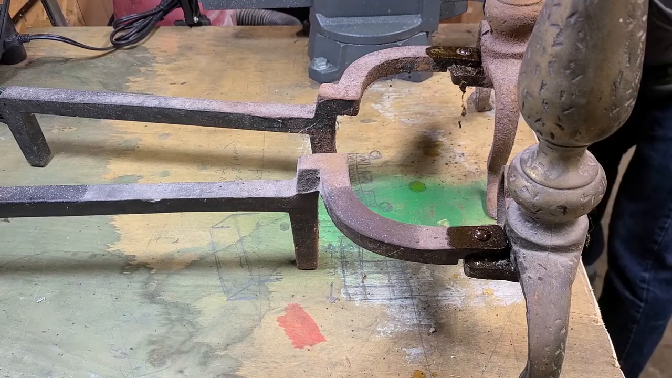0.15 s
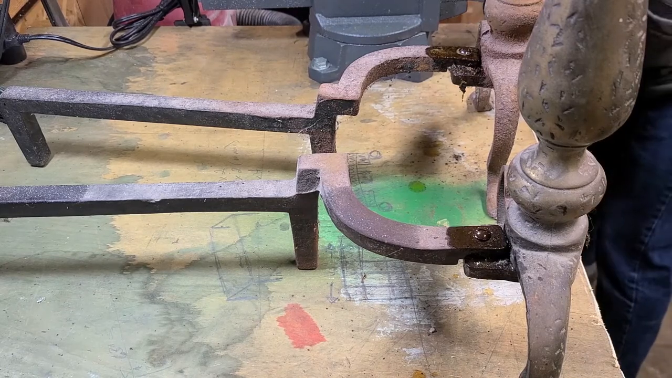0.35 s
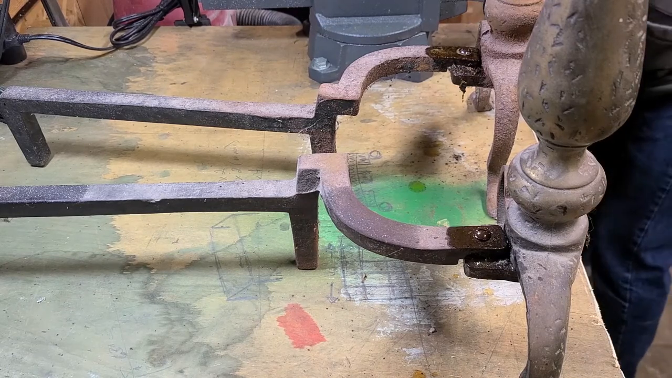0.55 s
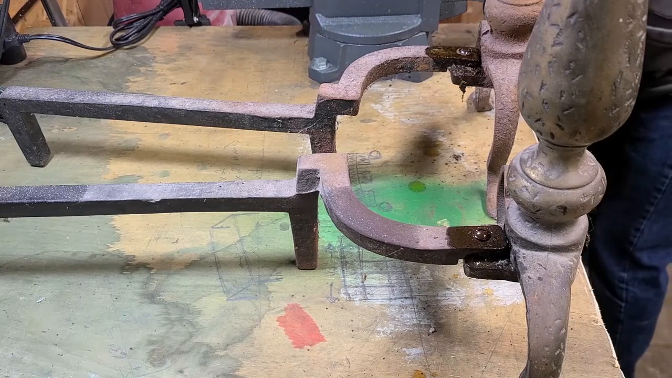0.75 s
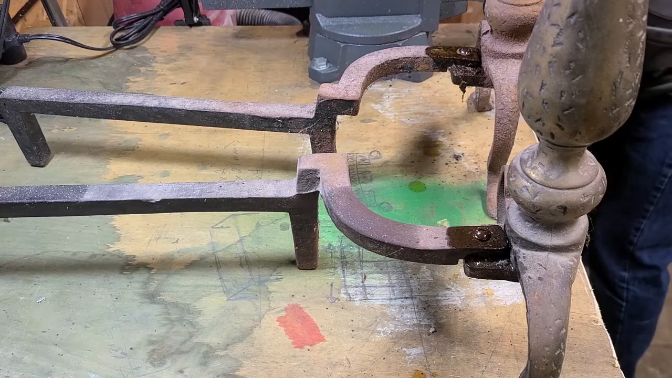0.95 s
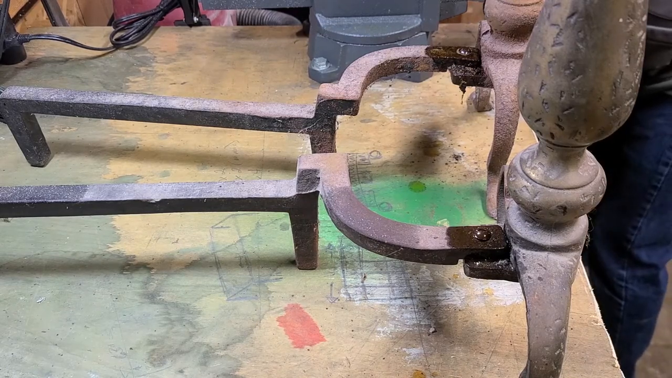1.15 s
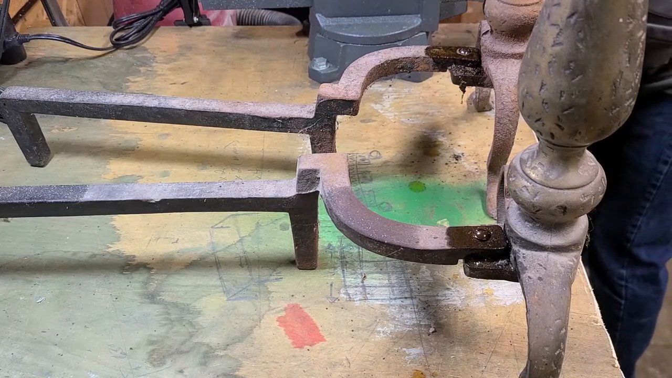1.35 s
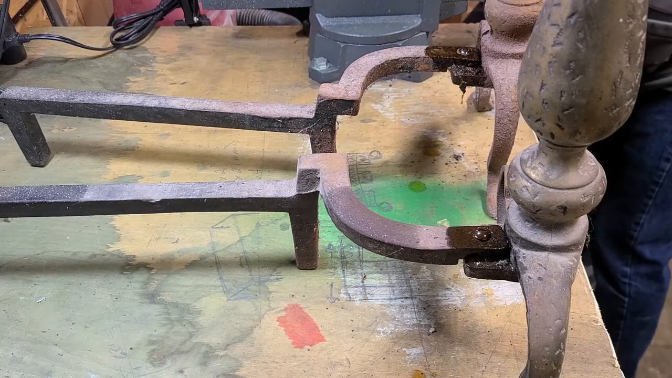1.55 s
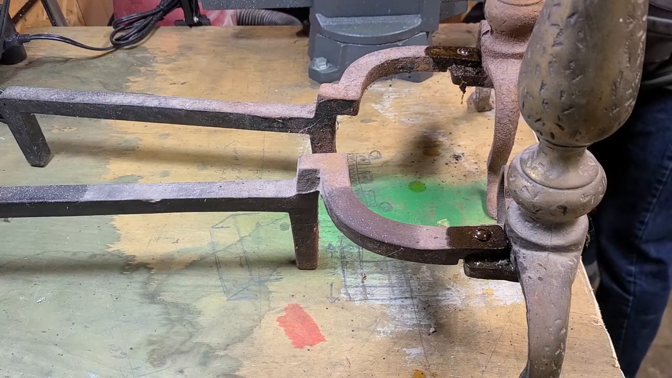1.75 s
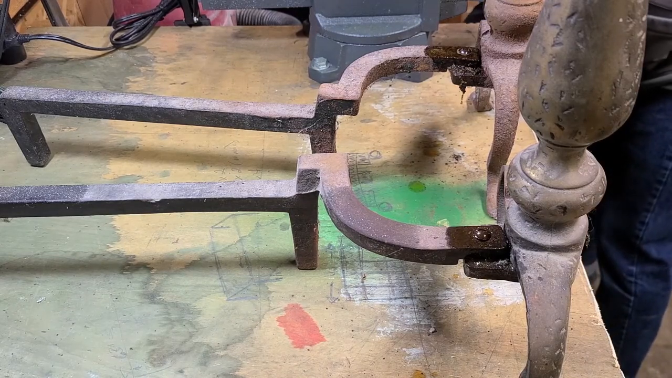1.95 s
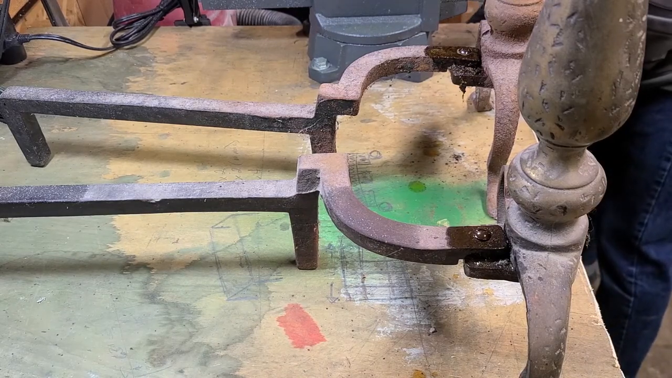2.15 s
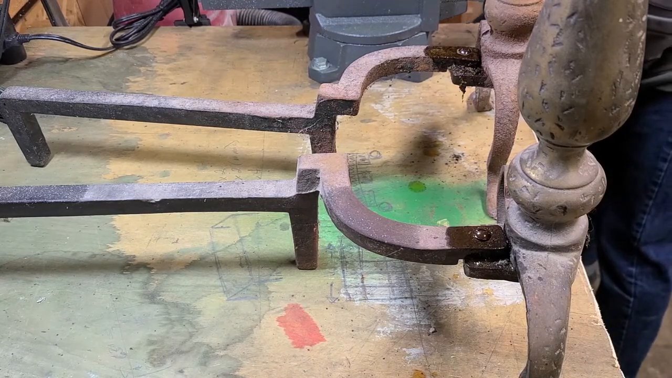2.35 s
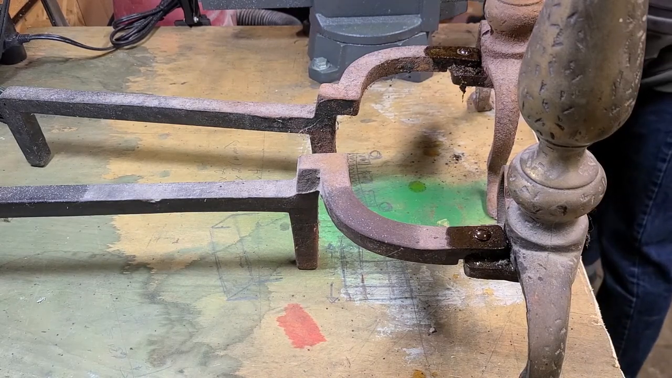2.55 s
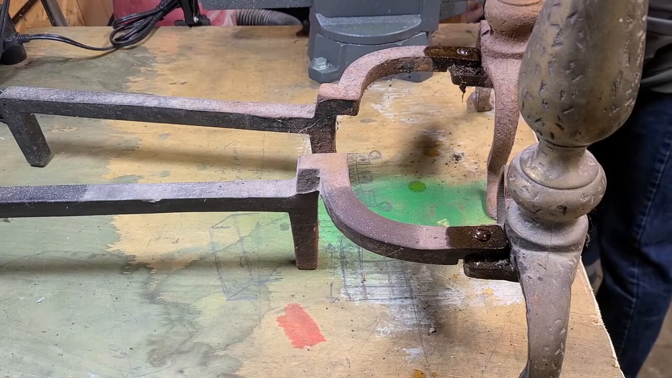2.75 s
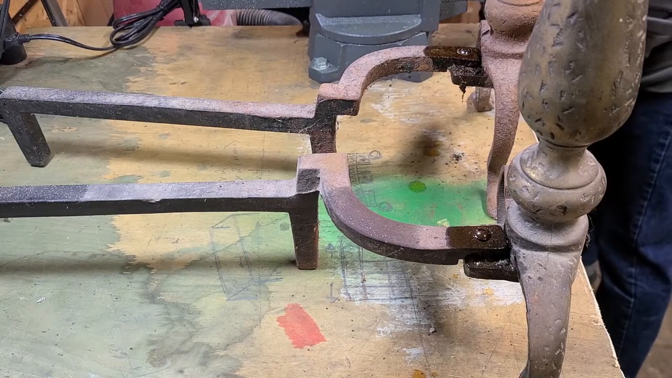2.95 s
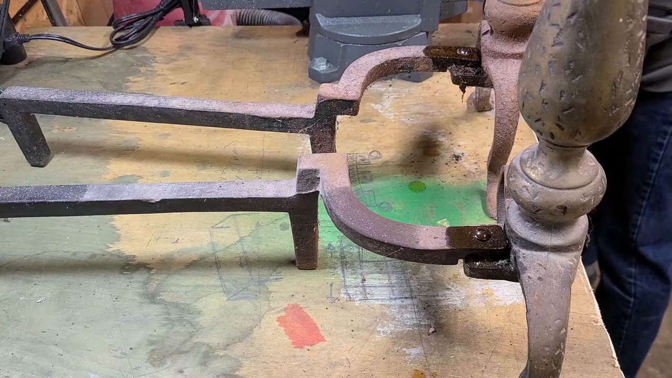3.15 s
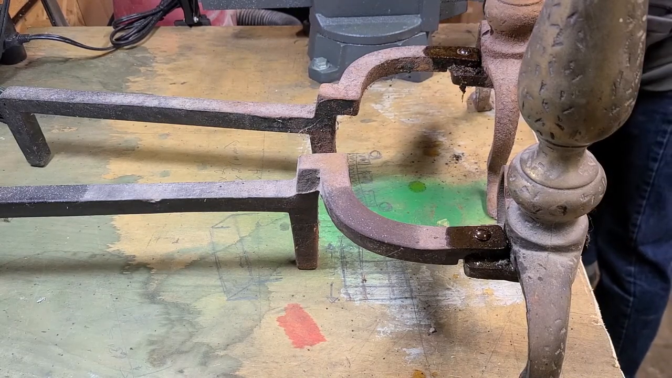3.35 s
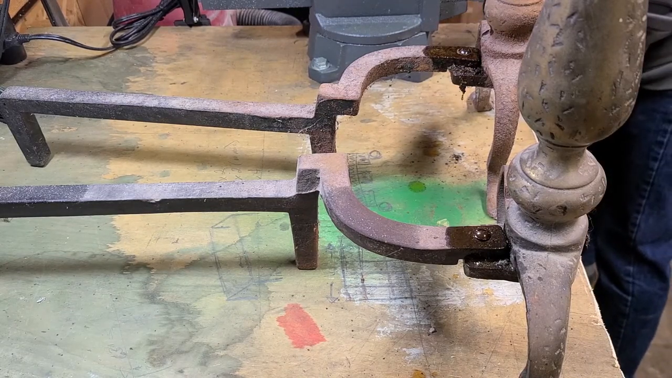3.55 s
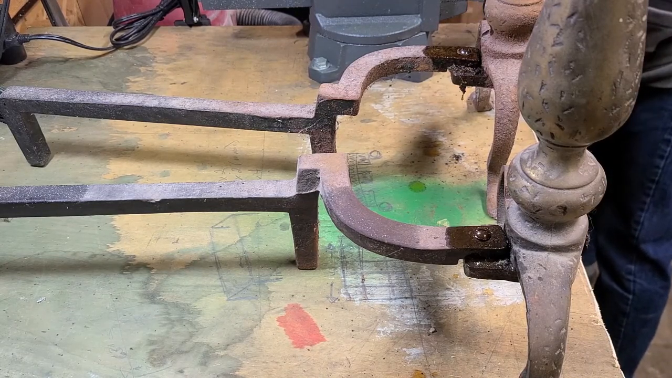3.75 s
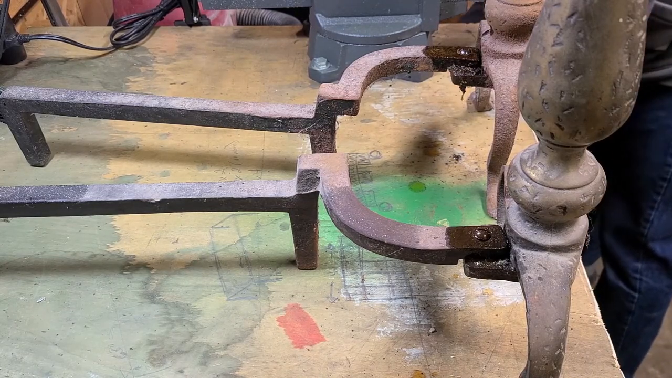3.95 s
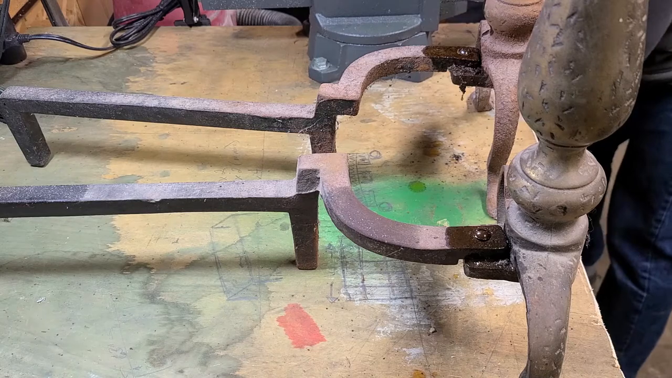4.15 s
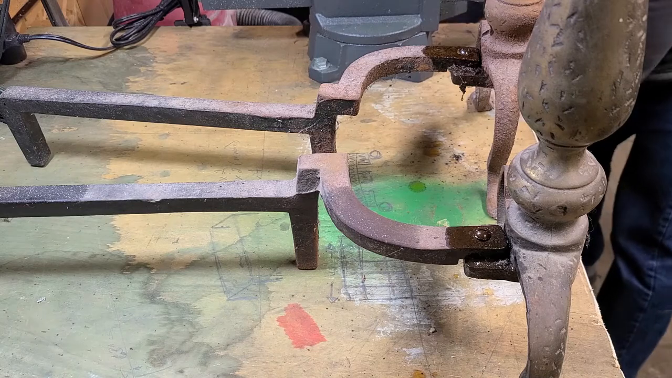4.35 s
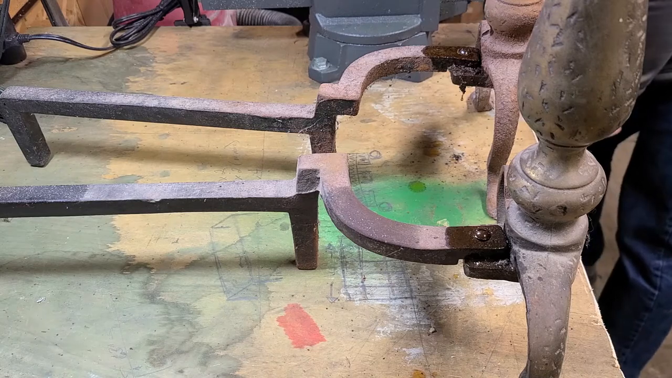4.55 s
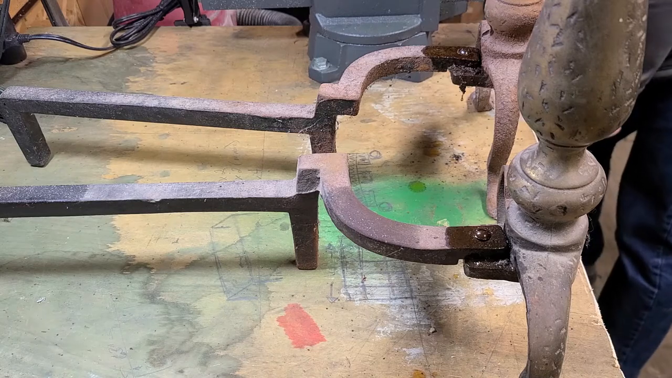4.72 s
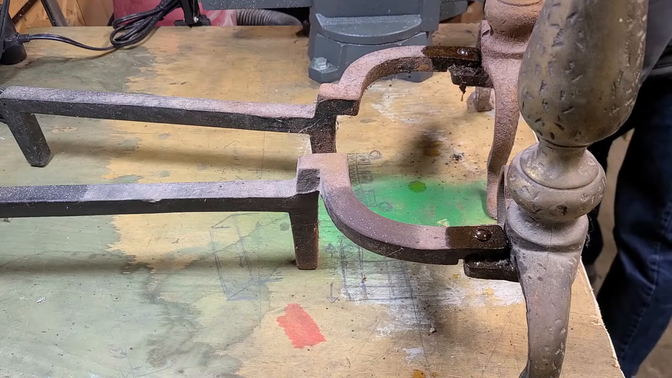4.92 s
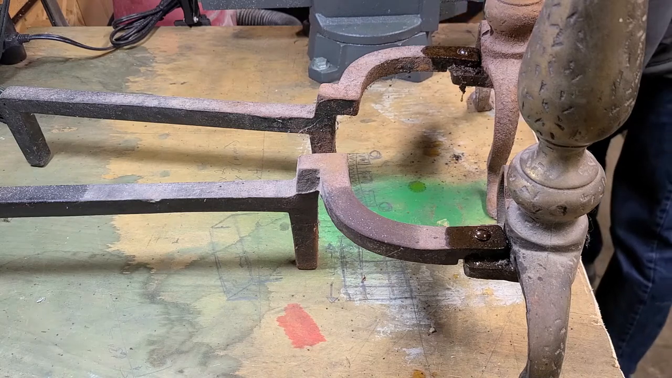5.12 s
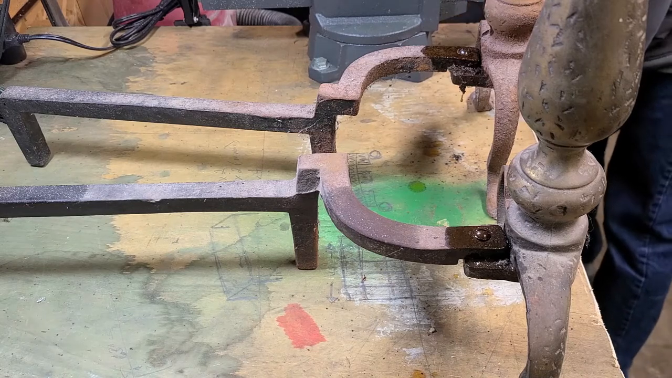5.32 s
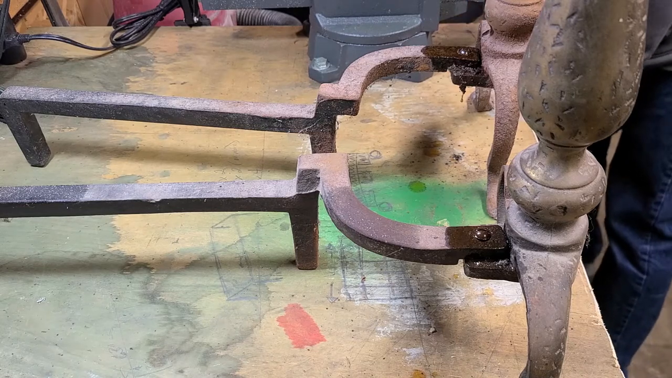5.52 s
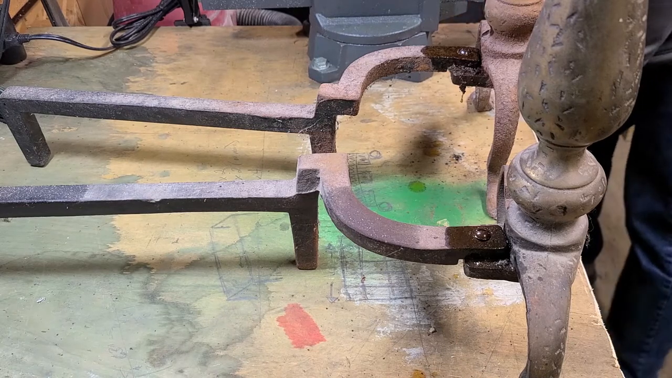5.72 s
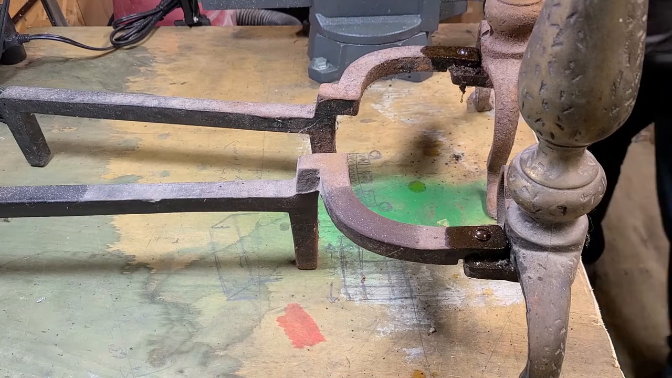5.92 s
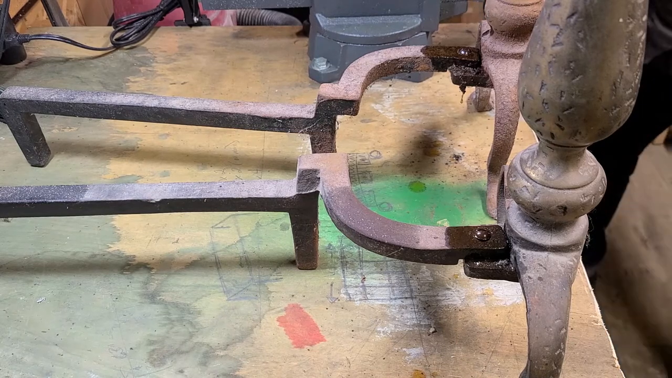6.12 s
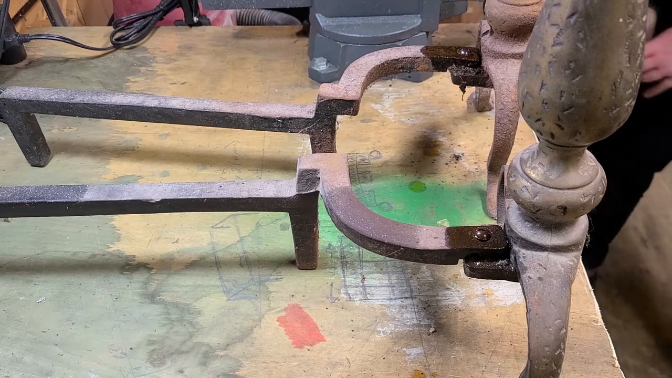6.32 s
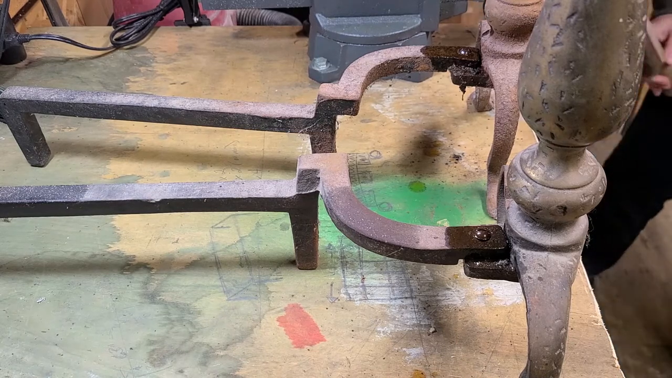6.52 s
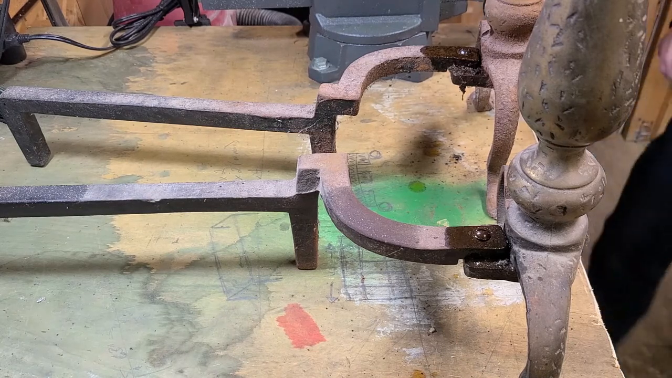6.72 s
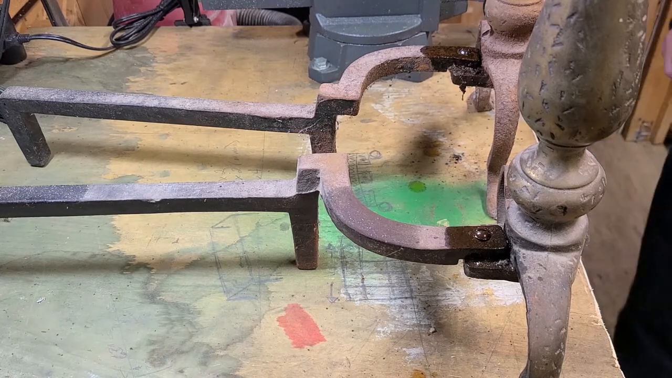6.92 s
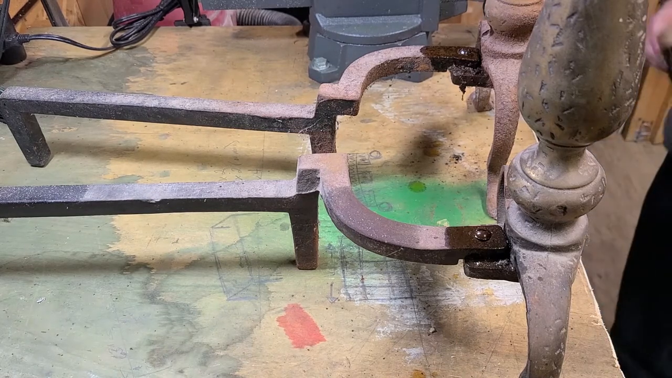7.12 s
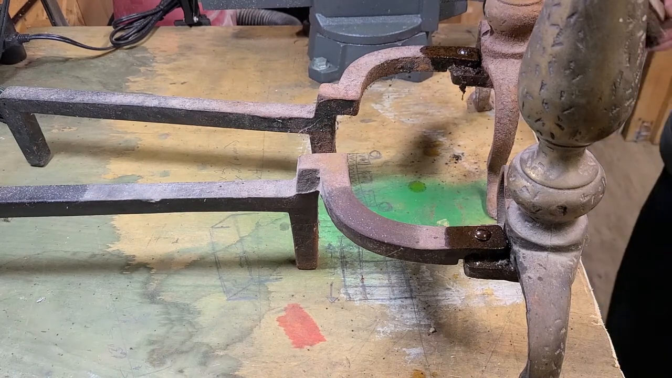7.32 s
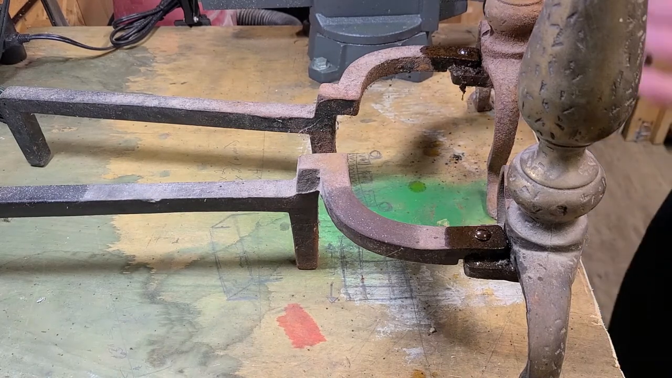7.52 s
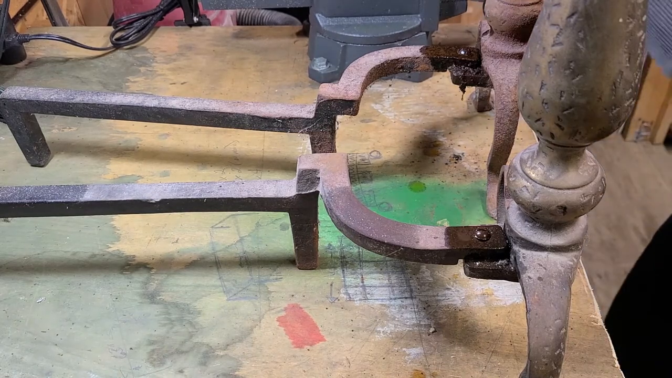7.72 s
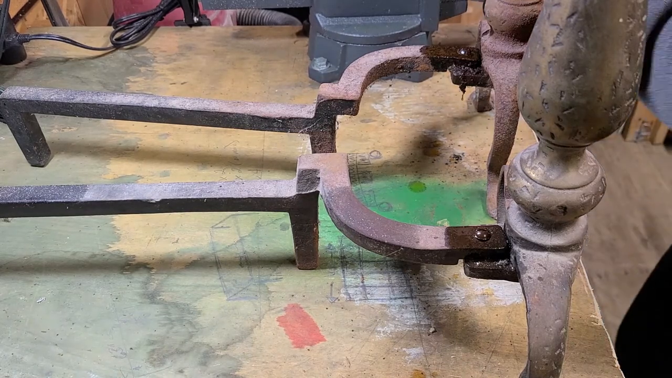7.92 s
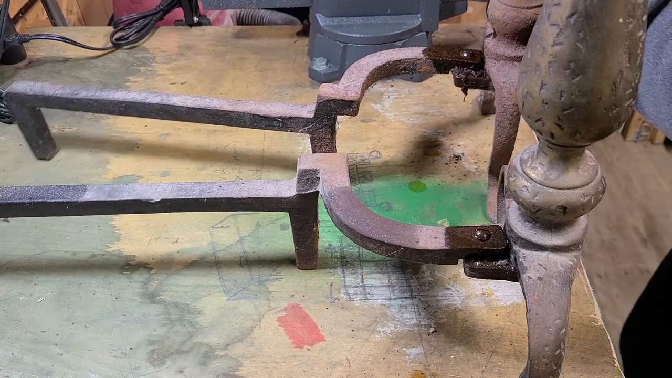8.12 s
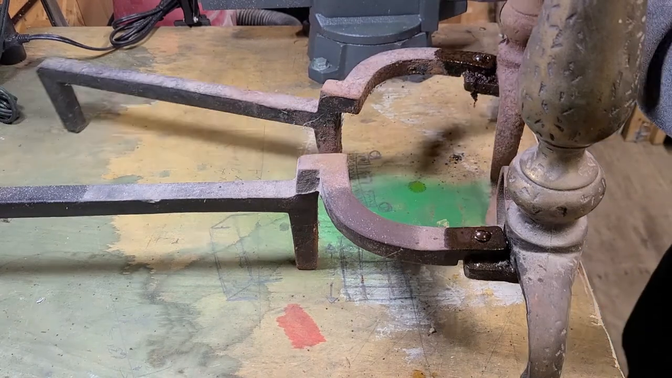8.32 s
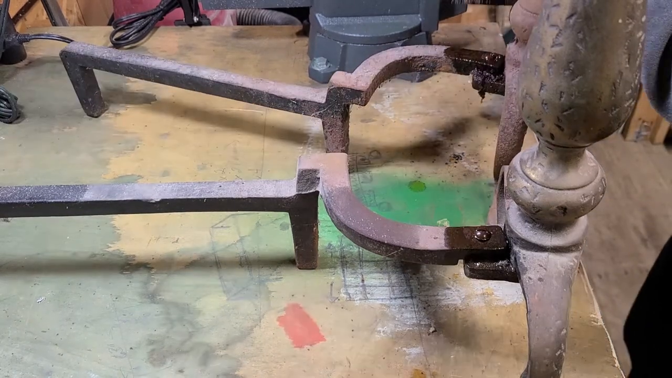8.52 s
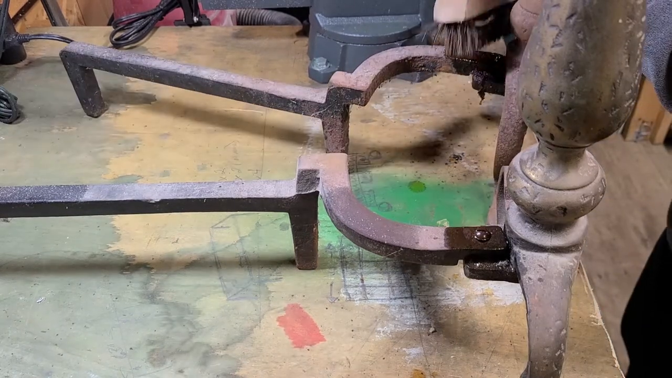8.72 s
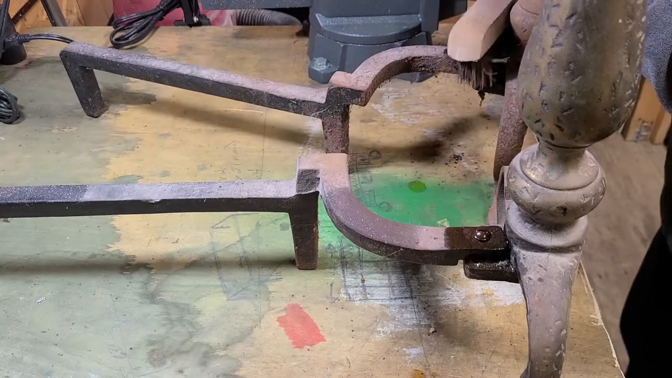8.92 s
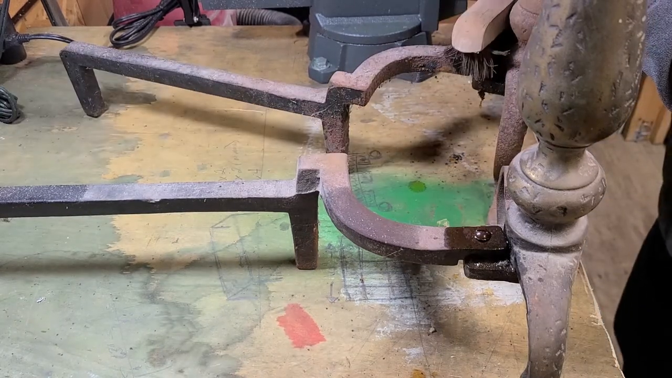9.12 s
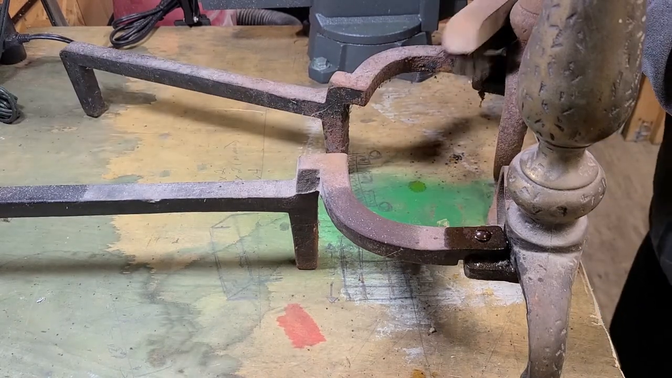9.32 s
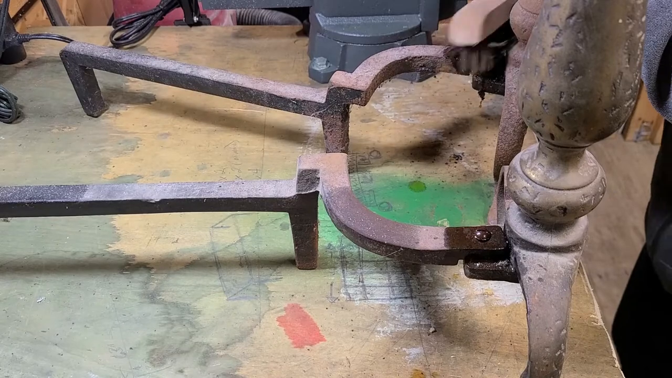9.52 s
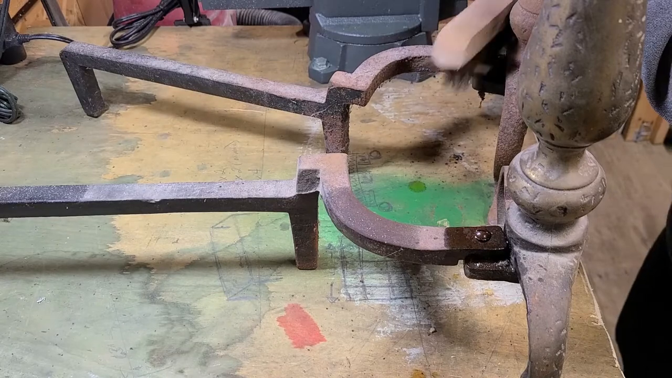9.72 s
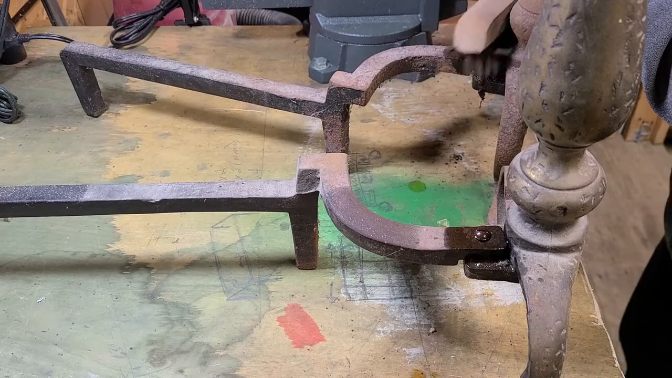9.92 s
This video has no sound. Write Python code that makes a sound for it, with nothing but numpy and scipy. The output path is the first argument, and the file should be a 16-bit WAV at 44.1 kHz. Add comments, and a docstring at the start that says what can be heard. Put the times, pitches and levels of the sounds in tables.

```python
"""In a small workshop someone rummages for a brush. Drawers slide with stick-slip friction and bump shut,
things knock, wood squeaks, a steel tool rings on after a slam, and a shoe scuffs the floor.
At about 8 s a cast-iron frame is dragged round and set down, exciting the wooden bench's low modes.
Then a wire brush scrubs it in quick strokes: the slipping tips hiss and drive the iron's resonances,
one mode briefly squeals, and the brush block clacks against the frame."""
import sys
import numpy as np
from scipy import signal
from scipy.fft import rfft, irfft, next_fast_len
from scipy.io import wavfile

SR = 44100
rng = np.random.default_rng(int(sys.argv[2]) if len(sys.argv) > 2 else 0)


def persist_wave(psi):
    """Save psi, clipped to +-1, as 16-bit WAV."""
    counts = np.round(np.clip(psi, -1, 1) * 32767).astype(np.int16)
    wavfile.write(sys.argv[1], SR, np.atleast_2d(counts).T)


N = 439677
TIME = np.arange(N) / SR


def from_db(db):
    """Amplitude ratio: tenfold for every 20 dB."""
    return 10 ** (np.asarray(db) / 20)


def rms_one(x):
    """Normalisation to unit power."""
    return x / np.sqrt(np.mean(x ** 2) + 1e-20)


def at_hz(points, hz):
    """Interpolation on a logarithmic frequency axis."""
    f, value = np.transpose(points)
    return np.interp(np.log(np.maximum(hz, 1)), np.log(f), value)


def band(x, low_hz, high_hz):
    """Causal band-pass filtering."""
    sos = signal.butter(2, [low_hz, min(high_hz, .45 * SR)], "band", fs=SR, output="sos")
    return signal.sosfilt(sos, x)


def colour(x, spectrum):
    """Spectral shaping: each frequency receives its own gain."""
    size = next_fast_len(N)
    gain = from_db(at_hz(spectrum, np.fft.rfftfreq(size, 1 / SR)))
    return irfft(rfft(x, size) * gain, size)[..., :N]


def split(x, crossovers_hz):
    """Crossover filtering into overlapping registers, each of unit power."""
    size = next_fast_len(N)
    rest, hz, parts = rfft(x, size), np.fft.rfftfreq(size, 1 / SR), []
    for edge in crossovers_hz:
        parts.append(rest / (1 + (hz / edge) ** 8))
        rest = rest - parts[-1]
    return np.array([rms_one(irfft(part, size)[:N]) for part in parts + [rest]])


def resonate(x, hz, width_hz):
    """Forced vibration of one damped mode; white noise keeps its power."""
    r = np.exp(-np.pi * width_hz / SR)
    zeros = np.sqrt((1 - r * r) / 2) * np.array([1, 0, -1])
    poles = [1, -2 * r * np.cos(2 * np.pi * hz / SR), r * r]
    return signal.lfilter(zeros, poles, x + 1e-18)


def damped_sine(t, hz, db, t60):
    """Free vibration of one mode, falling 60 dB in t60 seconds."""
    return from_db(db - 60 * t / t60) * np.sin(2 * np.pi * hz * t)


def grains(per_s, spread_db):
    """Friction as shot noise: tiny slips of uneven size at random moments."""
    sizes = from_db(spread_db * np.minimum(rng.exponential(1, N), 4)) * rng.choice([-1, 1], N)
    return rms_one(sizes * (rng.random(N) < per_s / SR))


def flutter(per_s, depth_db):
    """Random amplitude modulation from uneven pressure."""
    steps = rng.standard_normal(N // 20)
    return from_db(depth_db * np.interp(TIME * per_s, np.arange(len(steps)), steps))


def push(start_s, length_s, rise_s, stop_s):
    """Envelope of one movement: smooth rise, steady speed, exponential decay."""
    t = TIME - start_s
    rise = np.sin(np.pi / 2 * np.clip(t / rise_s, 0, 1)) ** 2
    return rise * np.exp(-np.clip((t - length_s) / stop_s, 0, 20))


# Width of the room's sound. Each row: frequency in Hz, side level relative to mid in dB.
FIELD_WIDTH = [(60, -30.5), (130, -6), (300, -7), (700, -1.5), (1400, 2.5), (2500, 1.5), (12000, 2)]
def stereo_noise():
    """A diffuse field is coherent at the two ears in the bass and much less so in the treble."""
    mid, side = rng.standard_normal((2, N))
    return mid + colour(side, FIELD_WIDTH) * [[1], [-1]]


# The workshop's decay. Each row: frequency in Hz, reverberation time in seconds.
ROOM_T60 = [(60, 1.73), (160, 0.43), (420, 0.44), (1100, 0.19), (2900, 0.092), (7700, 0.054)]
def room(x, wet_db, early_db=-2.5, early_t60=0.0785):
    """Reverberation: direct sound, dense early reflections and a tail absorbed sooner in the treble."""
    t, echo = TIME[:SR], 0
    spectrum = rfft(stereo_noise()[:, :SR])
    hz = np.clip(np.fft.rfftfreq(SR, 1 / SR), 60, 15360)
    early = from_db(early_db) * rms_one(from_db(-60 * t / early_t60))
    for centre in 60 * 2.0 ** np.arange(9):
        octave = np.clip(1 - abs(np.log2(hz / centre)), 0, 1)
        tail = rms_one(from_db(-60 * t / at_hz(ROOM_T60, centre)))
        fade = rms_one(tail + early) / np.sqrt(SR)
        echo = echo + irfft(spectrum * octave, SR) * fade
    wet = from_db(wet_db)
    reflected = signal.fftconvolve(np.atleast_2d(x), echo, axes=1)[:, :N]
    return (x + wet * reflected) / np.sqrt(1 + wet ** 2)


def roam(x, wet_db, dwell_s=.13, places=5):
    """A moving source meets a different room response at each place it passes."""
    shares = [np.clip(1 - abs((TIME / dwell_s - k) % places - 1), 0, 1) for k in range(places)]
    return sum(room(x * np.sqrt(share), wet_db) for share in shares)


# Spectrum of the still room. Each row: frequency in Hz, relative level in dB.
AIR_SPECTRUM = [(15, -40), (25, -26), (59, 3.5), (87, 2.5), (223, -19.5), (403, -16), (673, -25.5),
                (1430, -27), (2390, -33.5), (3050, -31), (7240, -40.5), (7850, -48.5), (8980, -39.5),
                (15800, -45.5)]
def air(level_db=-56.5):
    """Ambient noise: a steady diffuse field, strongest in the bass."""
    return from_db(level_db) * rms_one(colour(stereo_noise(), AIR_SPECTRUM))


# Spectrum of rubbing wood. Each row: frequency in Hz, relative level in dB.
WOOD_SPECTRUM = [(35, -14), (62, -3), (86, 3), (130, -8.5), (170, -7), (310, -10.5), (550, -12.5),
                 (850, -18.5), (1100, -19), (1500, -21.5), (2200, -26), (3100, -28.5), (4500, -39),
                 (8000, -46.5), (15800, -51)]
# Pushes of drawers and their contents. Each row: start and length in seconds, rumble, rub and hiss in dB.
SLIDES = [(0.0, 0.27, -44, -54, -71), (0.218, .23, -43.5, -45, -49), (0.468, 0.066, -38.5, -42.5, -63.5),
          (0.809, 0.17, -48.5, -73.5, -93), (1.02, 0.097, -46, -68, -70), (1.44, 0.066, -59, -62, -62),
          (1.52, 0.5, -55.5, -72.5, -85), (1.747, 0.1, -48.5, -54.5, -63), (1.941, 0.12, -44.5, -53, -69.5),
          (2.236, 0.14, -53, -57, -68), (2.351, 0.22, -41, -45.5, -54), (2.441, 0.097, -33, -28.5, -33.5),
          (2.538, 0.054, -34.5, -34.5, -43.5), (3.426, 0.23, -49, -61.5, -70.5),
          (3.574, 0.14, -38.5, -43.5, -53), (3.707, 0.17, -42.5, -45, -49.5), (3.87, 0.12, -26, -33.5, -38),
          (4.761, .05, -52, -52, -55), (4.8, 0.072, -32.5, -45, -54), (4.924, .13, -34, -53.5, -71.5),
          (5.084, .11, -33, -43, -60), (5.186, .12, -36, -42.5, -51.5), (5.366, 0.2, -38.5, -57.5, -72.5),
          (5.532, 0.072, -24.5, -47, -52), (5.566, 0.072, -19, -37, -58), (5.65, 0.11, -35, -71, -92),
          (6.44, 0.076, -42, -61.5, -70), (6.911, 0.085, -44.5, -47, -57.5),
          (7.107, 0.073, -34.5, -60, -76), (7.301, 0.13, -70, -65, -73.5), (7.463, 0.11, -53, -64, -70),
          (7.603, .08, -43.5, -57.5, -68.5), (7.769, .27, -70, -69.5, -67.5)]
def drawers(rumble_db=-1.0, groan_db=0.5, rub_db=-2.5, hiss_db=0.0):
    """Sliding friction in four registers: runners rumble, the box groans, wood rubs and grit hisses."""
    power = np.zeros((4, N))
    for s, length, rumble, rub, hiss in SLIDES:
        groan = rumble + 0.36 * (rub - rumble)
        motion = push(s, length, rise_s=.03, stop_s=.029)
        power += np.outer(from_db([rumble, groan, rub, hiss]) ** 2, motion ** 2)
    pressure = np.sqrt(power) * from_db([[rumble_db], [groan_db], [rub_db], [hiss_db]])
    slips = colour(grains(per_s=2500, spread_db=3.0), WOOD_SPECTRUM) * flutter(per_s=70, depth_db=2.5)
    low, *upper = pressure * split(slips, crossovers_hz=[180, 750, 3600])
    return band(low, 48, 370), sum(upper)


# Knocks of handling. Each row: time in seconds, then body, rap and tick levels in dB.
KNOCKS = [(.243, -33.5, -34.5, -44), (.499, -34, -31, -59), (.825, -44, -53.5, -73), (2.025, -40, -56, -49),
          (2.235, -50.5, -48, -55), (2.359, -30, -42, -65), (2.464, -18, -29.5, -49),
          (3.225, -34.5, -40.5, -43.5), (3.256, -32, -40, -58), (3.573, -28.5, -31.5, -53),
          (3.708, -47, -41, -36.5), (3.89, -24, -23.5, -33.5), (3.952, -30, -48, -23.5),
          (5.075, -33, -37, -74), (6.944, -47, -35, -43), (6.964, -31.5, -43, -55), (7.465, -36, -56, -63),
          (7.491, -49, -47.5, -53.5), (7.637, -35, -53, -65), (7.951, -33.5, -46.5, -55),
          (8.201, -16.5, -29.5, -38.5), (8.442, -28, -31.5, -48), (8.472, -22, -40, -53),
          (8.799, -34, -37, -41)]
def knocks(rise_s=.002, rattle_t60=0.14, soft_db=-56.0):
    """An impact breaks into a decaying rattle of contacts, heard in three registers."""
    force = np.zeros((3, N))
    for s, *levels_db in KNOCKS:
        start = round(s * SR)
        t = TIME[:N - start][:SR // 2]
        rattle = from_db(-60 * t / rattle_t60) * (1 - np.exp(-t / rise_s))
        strength = from_db(levels_db)
        strength = strength ** 2 / np.hypot(strength, from_db(soft_db))   # gentle touches stay dull
        force[:, start:start + len(t)] += np.outer(strength, rattle)
    contacts = band(colour(grains(per_s=6000, spread_db=3.0), WOOD_SPECTRUM), 206, 21000)
    return np.sum(force * split(contacts, crossovers_hz=[750, 3600]), axis=0)


# Low modes of heavy woodwork. Each row: frequency in Hz, relative level in dB, decay as a multiple of t60.
LOW_MODES = [(56.5, -9, 1), (76.03, 2, 0.99), (86.9, -5, 0.96), (109.5, -5, 1.2), (150.5, -3, 0.81),
             (167.4, -2, 0.77), (227, -5.5, 0.79), (266, -10, 0.8), (309, -12, .8)]
def thuds(blows, boom_gain_db, bump_gain_db, t60, rise_s=0.0071, split_hz=125):
    """Modal superposition: each blow excites a boom below split_hz and a bump above it."""
    out = np.zeros(N)
    for s, boom_db, bump_db in blows:
        start = round(s * SR)
        t = TIME[:N - start][:SR]
        onset = 1 - np.exp(-t / rise_s)
        for hz, db, ring in LOW_MODES:
            # the place of the blow shifts the modes a little and flips the upper ones
            mode = damped_sine(t, hz * (1 + rng.normal(0, 0.017)), db, t60 * ring)
            bump = rng.choice([-1, 1]) * from_db(bump_gain_db + bump_db)
            height = from_db(boom_gain_db + boom_db) if hz < split_hz else bump
            out[start:start + len(t)] += height * mode * onset
    return out


# Dull blows of drawers and feet. Each row: time in seconds, boom and bump levels in dB.
BUMPS = [(.824, -40.5, -50), (3.232, -33.5, -31), (3.891, -20.5, -12.5), (3.941, -23, -26),
         (3.994, -22, -22.5), (4.787, -35, -33.5), (4.957, -31, -40), (5.545, -19, -32), (5.62, -18, -27),
         (5.745, -23.5, -32.5), (6.462, -41, -40.5), (6.894, -36, -47.5), (6.957, -28.5, -29),
         (7.132, -34.5, -48), (7.465, -44, -34), (7.519, -37, -53), (7.644, -42.5, -46),
         (7.855, -35.5, -57)]
def bumps():
    """Resonance: after the dull thuds of drawers and footsteps, two low room tones drone on."""
    blows = thuds(BUMPS, boom_gain_db=0.5, bump_gain_db=2.0, t60=0.37)
    drone = from_db(-38) * resonate(blows, hz=81.35, width_hz=0.85)
    overtone = from_db(-41) * resonate(blows, hz=168.1, width_hz=2.4)
    return room(blows, wet_db=-8.5) + drone + overtone


# Faint squeaks of wood. Each row: time of the peak in seconds, frequency in Hz, level in dB.
SQUEAKS = [(1.48, 5100, -61), (1.73, 5470, -65), (2.867, 6950, -64.5), (2.975, 2988, -61)]
def squeaks(half_length_s=0.017, width_hz=160):
    """Stick-slip friction briefly excites a narrow resonance."""
    out = np.zeros(N)
    for s, hz, db in SQUEAKS:
        swell = from_db(db) * np.exp(-((TIME - s) / half_length_s) ** 2)
        out += swell * resonate(rng.standard_normal(N), hz, width_hz)
    return room(out, wet_db=-1.0)


# Hollow boxes set down. Each row: time in seconds, frequency in Hz, level in dB.
BOX_NOTES = [(1.52, 592, -44), (3.238, 268.6, -20.5), (3.305, 250.4, -29), (3.893, 330, -16),
             (7.464, 207, -28), (7.645, 223, -35.5)]
def boxes(rise_s=.004, t60=0.18):
    """A struck hollow wooden body vibrates briefly at its natural frequency."""
    out, t = np.zeros(N), TIME[:SR]
    for s, hz, db in BOX_NOTES:
        start = round(s * SR)
        out[start:start + SR] += damped_sine(t, hz, db, t60) * (1 - np.exp(-t / rise_s))
    return room(out, wet_db=-12)


# Modes of a steel tool. Each row: frequency in Hz, level in dB, 60 dB decay time in seconds.
TOOL_MODES = [(2716, -44, 0.39), (3385, -53, 0.48)]
def tool(slam_s=3.944):
    """Lightly damped steel stays in free vibration after its drawer slams."""
    t = np.maximum(TIME - slam_s, 0)
    return room(sum(damped_sine(t, hz, db, t60) for hz, db, t60 in TOOL_MODES), wet_db=-1.0)


def scuff(level_db=-58.5, grit_db=4.0):
    """Friction of a sole on the floor excites one broad resonance amid soft grit."""
    slips = grains(per_s=3800, spread_db=2.5)
    sole = resonate(slips, hz=1100, width_hz=250)
    grit = from_db(grit_db) * rms_one(band(colour(slips, WOOD_SPECTRUM), 380, 5100))
    motion = push(start_s=6.25, length_s=0.068, rise_s=0.029, stop_s=0.053)
    return room(from_db(level_db) * motion * (sole + grit), wet_db=-2)


# The frame landing and rocking. Each row: time in seconds, boom and bump levels in dB.
THUMPS = [(7.952, -23, -31), (8.195, -23, -23.5), (8.239, -22.5, -33), (8.452, -7.5, -17.5),
          (8.474, -8, -10.5), (8.8, -14.5, -28.5), (8.842, -34, -18), (8.871, -21, -31), (9.318, -23, -19),
          (9.34, -26, -24), (9.855, -25, -19), (9.871, -25, -25)]
def thumps():
    """Impacts of the heavy frame transfer momentum to the bench's low modes."""
    blows = thuds(THUMPS, boom_gain_db=4.5, bump_gain_db=3.0, t60=0.196)
    return room(band(blows, 41, 1900), wet_db=-12)


# Modes of the cast-iron frame. Each row: frequency in Hz, relative level in dB.
IRON_MODES = [(441.4, -53.5), (559.9, -51), (705, -53.5), (1147, -45.5), (1281, -54.5), (1523, -49),
              (1954, -52.5), (1997, -53.5), (2202, -48), (2422, -58), (2455, -60), (2794, -45),
              (3144, -44.5), (3338, -55), (3607, -48), (3720, -59), (4161, -58.5), (4404, -62), (5523, -75),
              (5814, -50.5), (6315, -64), (6783, -51), (6928, -68), (7084, -56), (7321, -65), (7364, -72)]
def iron(force, width_hz=12, damping=0.0088):
    """Damping widens the higher modes; each reaches the two ears with its own level and delay."""
    out = np.zeros((2, N))
    for k, (hz, db) in enumerate(IRON_MODES):
        lean_db = rng.normal(0, 1.8)
        lag = round(rng.uniform(-0.76, 1) * 9)
        mode = (-1) ** k * from_db(db) * resonate(force, hz, width_hz + damping * hz)
        out += [mode * from_db(lean_db), np.roll(mode, lag) * from_db(-lean_db)]
    return out / np.linalg.norm(from_db(np.array(IRON_MODES)[:, 1]))


# Spectrum of iron scraping wood. Each row: frequency in Hz, relative level in dB.
SCRAPE_SPECTRUM = [(59, -37.5), (100, -5), (241, 0), (279, -12.5), (443, -5), (502, -11.5), (558, 3.5),
                   (633, -14), (797, -9), (1260, -26), (1350, -17), (4260, -32), (15000, -58.5)]
# Course of the drag. Each row: time in seconds, scrape level in dB.
DRAG_LEVELS = [(7.97, -45), (8.05, -50.5), (8.12, -36.5), (8.21, -31), (8.285, -34.5), (8.335, -28.5),
               (8.385, -36), (8.405, -44), (8.44, -44)]
def drag(scrape_db=1.0, ring_db=-6.0, fade_s=.015):
    """Stick-slip friction under the iron feet drives both the bench top and the frame."""
    s, db = np.transpose(DRAG_LEVELS)
    gate = np.interp(TIME, [s[0] - fade_s, s[0], s[-1], s[-1] + fade_s], [0, 1, 1, 0])
    strength = gate * from_db(np.interp(TIME, s, db))
    force = strength * grains(per_s=1200, spread_db=1.0)
    wood = strength * rms_one(colour(grains(per_s=1200, spread_db=4.0), SCRAPE_SPECTRUM))
    ring = band(iron(force), 500, 2300)
    return room(from_db(scrape_db) * wood + from_db(ring_db) * ring, wet_db=0.5)


# Iron touching iron close by. Each row: time in seconds, level in dB.
CLICKS = [(7.99, -49), (8.043, -53), (8.444, -30.5), (8.475, -39), (8.802, -29.5)]
def clicks(rise_s=0.0012, t60=0.048):
    """A brief, stiff contact has a broad spectrum: a bright tick with a trace of the frame's ring."""
    force = np.zeros(N)
    for s, db in CLICKS:
        t = np.maximum(TIME - s, 0)
        force += from_db(db - 60 * np.minimum(t / t60, 3)) * (1 - np.exp(-t / rise_s))
    tick = force * rng.standard_normal((2, N))
    return room(band(tick, 1500, 17000) + iron(tick[0]), wet_db=-10)


# Modes of the brush block. Each row: frequency in Hz, relative level in dB, unscaled t60 in seconds.
BLOCK_MODES = [(764, -2.5, 0.086), (850, 1.5, 0.17), (1050, -10, 0.22), (1138, 2, 0.17), (1272, -1, 0.077),
               (1508, -12.5, 0.16)]
# Bench or block striking the iron. Each row: time in seconds, lower and upper ring levels in dB.
CLACKS = [(8.203, -22.5, -27), (8.473, -19, -41), (8.842, -13.5, -16), (9.552, -25, -23), (9.851, -13, -14)]
def clacks(tone_db=-1.5, decay_scale=0.67, crack_db=2.0, crack_t60=0.063, split_hz=980):
    """An impact gives a dry crack and a hollow ring; softer contact excites the upper modes less."""
    out, t = np.zeros(N), TIME[:SR // 2]
    for s, lower_db, upper_db in CLACKS:
        tone = 0
        for k, (hz, db, t60) in enumerate(BLOCK_MODES):
            strike_db = lower_db if hz < split_hz else upper_db
            tone += (-1) ** k * damped_sine(t, hz, db + strike_db, decay_scale * t60)
        noise = rms_one(band(band(rng.standard_normal(len(t)), 440, 1420), 360, 1360))
        crack = noise * from_db(lower_db - 60 * t / crack_t60)
        start = round(s * SR)
        out[start:start + len(t)] += (from_db(tone_db) * tone + from_db(crack_db) * crack)[:N - start]
    return room(band(out, 199, 1870), wet_db=-0.5)


# Modes of the bench top. Each row: frequency in Hz, relative level in dB, 60 dB decay time in seconds.
CLUNK_MODES = [(249, -4.5, 0.077), (321.5, -1, 0.11), (535, -1.5, 0.065), (641, -16, 0.08), (666, -7, 0.1)]
def clunk(landing_s=8.473, level_db=-8.0):
    """The frame's full weight lands and excites heavily damped modes of the bench top."""
    t = np.maximum(TIME - landing_s, 0)
    tone = sum((-1) ** k * damped_sine(t, hz, db + level_db, t60)
               for k, (hz, db, t60) in enumerate(CLUNK_MODES))
    return room(tone, wet_db=-20.0)


# A light touch, then strokes to and fro. Each row: start and length in seconds, hiss and bite in dB.
STROKES = [(8.712, 0.048, -54, -55), (8.875, 0.11, -40, -40), (9.099, 0.096, -39, -48),
           (9.293, 0.078, -32.5, -31.5), (9.437, 0.1, -32.5, -34.5), (9.649, 0.089, -31.5, -30),
           (9.832, 0.12, -32.5, -35)]
def scrubbing(rise_s=0.044, bite_rise_s=0.022, stop_s=0.034, pressed_s=8.83):
    """Friction follows each stroke; the wires bite into the iron before they reach full speed."""
    hiss = sum(from_db(db) * push(s, length, rise_s, stop_s) for s, length, db, _ in STROKES)
    bite = sum(from_db(db) * push(s, length, bite_rise_s, stop_s) for s, length, _, db in STROKES)
    pressed = np.clip((TIME - pressed_s) / rise_s, 0, 1)
    rustle = pressed * from_db([[-46], [-47.5]])   # the wires stay on the iron between strokes
    return np.hypot([hiss, bite], rustle)


def bounce(x, delay_ms=2.7, swing_ms=0.11, echo_db=-8.5):
    """Comb filtering: a reflection off the bench top, whose path changes with each stroke."""
    starts = np.array(STROKES)[:, 0]
    position = np.interp(TIME, starts, (-1) ** np.arange(len(starts)))
    lag_s = (delay_ms + swing_ms * position) / 1000
    return x + from_db(echo_db) * np.array([np.interp(TIME - lag_s, TIME, side) for side in x])


# Spectrum of the wires' hiss. Each row: frequency in Hz, relative level in dB.
BRISTLE_SPECTRUM = [(300, 4.5), (600, -24), (950, -9), (1250, 3.5), (1800, -9), (2500, -1), (3200, 4.5),
                    (4600, 1), (7000, -1.5), (8000, -3.5), (11000, -3.5), (14000, 0), (16000, 0)]
def bristles(strength):
    """Thousands of independent flicks add incoherently to a hiss, a little to the left."""
    tips = np.array([grains(per_s=8000, spread_db=2.5) for side in range(2)])
    return bounce(strength * rms_one(colour(tips, BRISTLE_SPECTRUM)) * from_db([[.7], [-.7]]))


# Narrow dips that give the brushing a hollow colour. Each row: frequency in Hz, bandwidth in Hz.
NOTCHES = [(945, 140), (1405, 86), (2375, 38), (2565, 55), (5260, 290)]
def brush(hiss_db=4.0, ring_db=3.5, block_db=-14.0, judder_db=-3.0):
    """Wire tips catch on rust and flick free, hissing and forcing iron, block and bench to vibrate."""
    hiss, bite = scrubbing() * flutter(per_s=220, depth_db=1.0)
    wires = bristles(from_db(hiss_db) * hiss)
    force = bite * grains(per_s=3000, spread_db=3.0)
    ring = from_db(ring_db) * band(iron(force), 250, 9500)
    block = sum(from_db(db) * resonate(force, hz, width_hz=42) for hz, db, _ in BLOCK_MODES)
    judder = sum(from_db(db) * resonate(force, hz, width_hz=9.9) for hz, db, _ in LOW_MODES)
    bodies = ring + from_db(block_db) * block + from_db(judder_db) * band(judder, 73, 234)
    out = room(wires, wet_db=-2.5) + room(bodies, wet_db=-10.5)
    for hz, width_hz in NOTCHES:
        out = signal.lfilter(*signal.iirnotch(hz, hz / width_hz, fs=SR), out + 1e-18)
    return out


def squeal(hz=2215, level_db=-33):
    """Self-excited vibration: in one stroke the wires stick and slip in step with a mode of the iron."""
    tone = rms_one(np.sin(2 * np.pi * hz * TIME)) * flutter(per_s=120, depth_db=2.0)
    envelope = push(start_s=9.31, length_s=.07, rise_s=.008, stop_s=.012)
    return room(from_db(level_db) * envelope * tone, wet_db=-12)


def scene():
    """Superposition: still air all round, rummaging a little to the right, then bench work in front."""
    ambience = air()
    rumble, rubbing = drawers()
    handling = room(rumble, wet_db=-10) + roam(rubbing + knocks(), wet_db=3.5)
    handling += boxes() + squeaks() + tool() + scuff()
    frame = thumps() + clunk() + clicks() + drag()
    return ambience + handling * from_db([[-.6], [.6]]) + bumps() + frame + brush() + squeal() + clacks()


def record(dry, ceiling=1.2, cutoff_hz=15750):
    """Soft saturation rounds the peaks; a steep low-pass filter removes the highest treble."""
    low_pass = signal.ellip(14, .1, 90, cutoff_hz, fs=SR, output="sos")
    return signal.sosfilt(low_pass, ceiling * np.tanh(dry / ceiling))


dry = scene()
out = record(dry)
persist_wave(out)
```